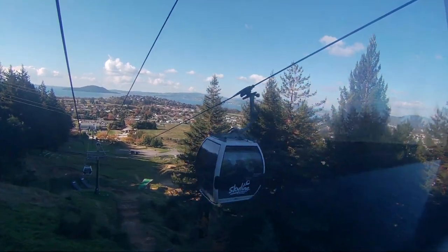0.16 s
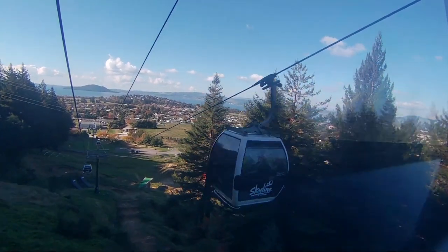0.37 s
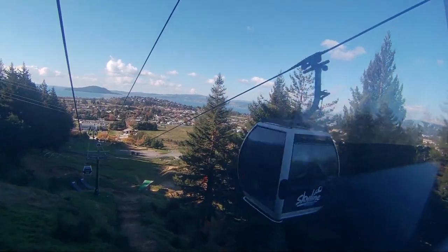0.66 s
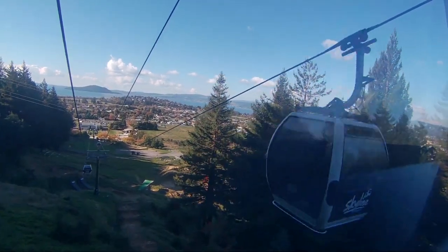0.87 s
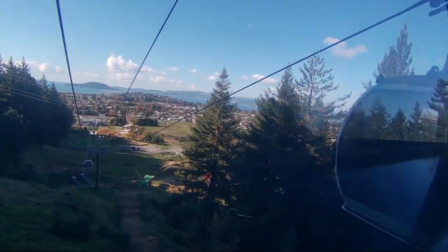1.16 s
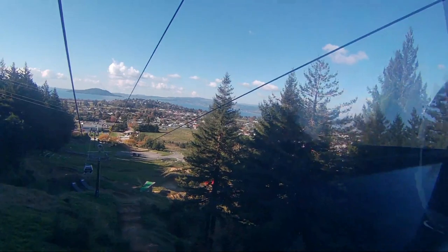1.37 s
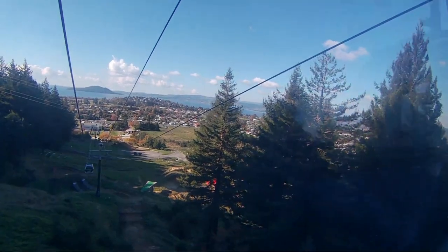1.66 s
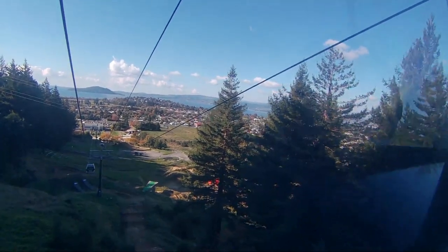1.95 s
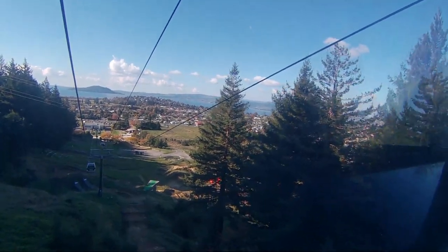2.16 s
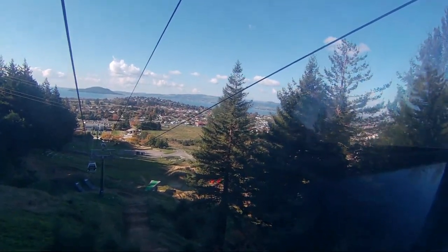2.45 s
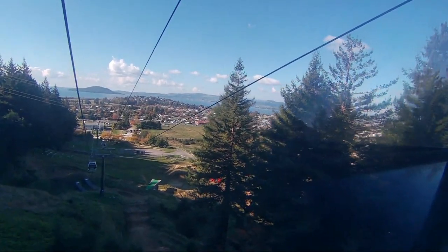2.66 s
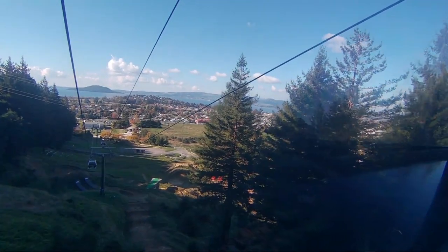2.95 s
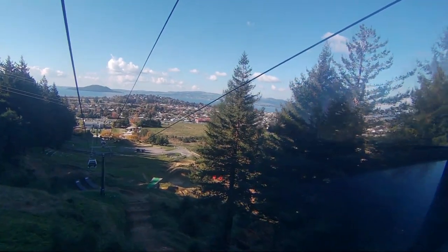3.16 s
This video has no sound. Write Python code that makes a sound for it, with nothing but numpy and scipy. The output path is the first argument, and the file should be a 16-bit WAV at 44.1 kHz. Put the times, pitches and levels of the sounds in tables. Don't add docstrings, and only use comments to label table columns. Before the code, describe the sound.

Rapid metallic clanking and low rumbling in a cable car cabin, then dry knocks, fading to hiss

```python
import sys
import numpy as np
from scipy import signal
from scipy.fft import rfft, irfft
from scipy.io import wavfile
from scipy.ndimage import uniform_filter1d

SR = 44100
rng = np.random.default_rng(int(sys.argv[2]) if len(sys.argv) > 2 else 0)


def inscribe(sig):
    pcm = np.round(np.clip(np.atleast_2d(sig).T, -1, 1) * 32767)
    wavfile.write(sys.argv[1], SR, pcm.astype(np.int16))


def rack_gain(trim_db):
    fader = np.asarray(trim_db, float)
    return 10 ** (fader / 20)


N = 145530

# start in seconds, peak in dB, brightness in dB per octave,
# ring t60 in seconds.
WHEEL_CLANKS = [(0.057, -41.5, -0.5, 0.082), (0.1, -41.5, -1.5, 0.23), (0.21, -41, -3, 0.11),
                (0.3342, -30.5, 1, 0.12), (0.44, -31.5, 0.5, 0.086), (0.5488, -27.5, 2, 0.14),
                (0.6635, -27.5, 1, 0.11), (0.785, -29, 2, 0.16), (0.886, -34.5, -0.5, 0.42),
                (0.9933, -27.5, 1.5, 0.093), (1.1078, -27, 2.5, 0.14), (1.228, -33.5, 1.5, 0.084),
                (1.333, -39, 0, 0.084), (1.462, -37.5, -0.5, 0.18), (1.559, -35, 2, 0.14),
                (1.708, -45.5, -4, 0.084), (1.745, -37, 0, 0.19), (1.841, -49, -4.5, 0.059),
                (1.9377, -38, 0, 0.17), (2.052, -37, -1, 0.25), (2.1565, -43, -2, 0.16),
                (2.2573, -32, 1, 0.19), (2.3658, -31, 1.5, 0.17), (2.4785, -36.5, 0.5, 0.13),
                (2.562, -41, -3, 0.23), (2.673, -43, -1.5, 0.13), (2.7994, -64, -0.5, 0.065),
                (2.9133, -69, -4, 0.15)]
# start in seconds, peak in dB, t60 in seconds.
GRIP_REBOUNDS = [(0.2848, -59, 0.06), (0.407, -52, 0.06), (0.52, -51, 0.06), (0.631, -52, 0.086),
                 (0.8614, -54, 0.06), (0.9762, -49, 0.082), (1.074, -53.5, 0.07), (1.4381, -65, 0.06),
                 (1.5444, -65, 0.06), (1.6496, -62, 0.056), (1.701, -60, 0.06), (1.801, -55, 0.04),
                 (2.0014, -59, 0.062), (2.208, -61, 0.04), (2.53, -64, 0.1), (2.606, -67, 0.05),
                 (2.635, -69, 0.07)]
# start in seconds, peak in dB, hardness in dB per octave.
FITTING_KNOCKS = [(1.2829, -19, -0.5), (1.5021, -15, 3), (1.6119, -19, 0.5), (1.716, -28.5, -2.5),
                  (1.8128, -19, 1), (1.911, -20.5, -0.5), (2.011, -18, 0.5), (2.1137, -17.5, 1),
                  (2.2168, -20.5, -0.5), (2.32, -20, -0.5), (2.4165, -22, -1), (2.5161, -24.5, -1.5),
                  (2.6166, -30, -2.5)]
# start in seconds, peak in dB, contact time in seconds.
LATCH_CLICKS = [
    (1.3978, -5.5, .00005),
    (1.502, -22, 0.000072),
]
# start in seconds, peak in dB, pitch in Hz.
SHELL_THUMPS = [(0.008, -39, 175), (0.06, -37, 167), (0.194, -29.5, 122), (0.226, -23.5, 151),
                (0.268, -28.5, 137), (0.311, -24, 139), (0.34, -23.5, 127), (0.407, -19.5, 123),
                (0.447, -19, 195), (0.518, -21.5, 179), (0.546, -20.5, 133), (0.569, -15.5, 111),
                (0.631, -17, 147), (0.712, -21.5, 127), (0.806, -26, 122.5), (0.862, -20.5, 167),
                (0.884, -23, 190), (0.977, -22, 224), (1.0, -22.5, 229), (1.028, -18.5, 132),
                (1.078, -18.5, 106), (1.102, -22.5, 220), (1.139, -19.5, 135), (1.248, -19, 168.5),
                (1.285, -22.5, 126), (1.315, -23.5, 125), (1.358, -23, 182), (1.468, -22, 176),
                (1.503, -25, 220), (1.523, -27, 121), (1.574, -30.5, 235), (1.614, -26, 198),
                (1.735, -22, 104), (1.815, -29, 181), (1.844, -28.5, 135), (1.913, -25, 118),
                (2.013, -30, 209), (2.04, -24.5, 125), (2.063, -29, 187), (2.115, -29.5, 187),
                (2.219, -36.5, 277), (2.322, -30.5, 127), (2.357, -27, 176), (2.385, -22.5, 125),
                (2.418, -39, 146), (2.476, -26.5, 105), (2.518, -27.5, 232), (2.535, -32.5, 180),
                (2.599, -30, 232), (2.639, -29.5, 134), (2.78, -34.5, 163), (2.813, -34, 141),
                (2.844, -37, 123), (2.884, -37, 193), (2.914, -29, 138), (2.931, -34, 224),
                (2.953, -29, 139), (2.998, -42, 159), (3.216, -50.5, 122)]
# time in seconds, level in dB.
RUMBLE_LEVEL = [(0.0, -27.5), (0.14, -44.5), (0.3, -30), (0.52, -24), (0.95, -30.5), (1.02, -24.5),
                (1.64, -31), (1.67, -40.5), (1.75, -35), (1.79, -33.5), (1.81, -32), (2.21, -35.5),
                (2.5, -28), (2.69, -43.5), (2.89, -45.5), (2.96, -43), (3.01, -48), (3.3, -65.5)]
# frequency in Hz, width in Hz, level in dB.
STEEL_MODES = [(510, 160, -5.5), (671, 110, 3), (882, 260, -0.5), (1234.4, 120, 2), (1408, 180, 0),
               (1789, 400, -4.5), (2546, 340, -12), (3560, 210, -21), (4266, 230, -21.5), (4346, 550, -21),
               (6800, 1600, -36)]
# frequency in Hz, density in dB per Hz.
CLANK_SPECTRUM = [(210, -40), (350, 8), (1050, -16.5), (1380, -10), (1600, -7.5), (1840, -11),
                  (3200, -32.5), (4260, -37.5), (9000, -78), (11700, -89), (19800, -120)]
# frequency in Hz, width in Hz, level in dB.
SHELL_MODES = [(85, 18, -5), (118.8, 18, -2), (146.4, 16.7, 2), (186, 25.1, -14), (224.4, 16.3, -3),
               (257.4, 27, -8), (288.5, 14, -8.5), (349.7, 20, -12.5), (456, 97, -20.5)]
# frequency in Hz, level in dB, t60 in seconds.
FITTING_MODES = [(294, -1, 0.0077), (965, -3, 0.0063), (1770, -20, 0.0045), (2534, -14, 0.012),
                 (3480, -25, 0.007), (4110, -27.5, 0.0097), (7030, -32, 0.0023), (8850, -37.5, 0.0048)]
# frequency in Hz, level in dB, t60 in seconds, side struck as signed gain.
LATCH_MODES = [(1890, -12.5, 0.0046, 1), (2340, -9.5, 0.0055, -1.1), (3340, -7, .003, 0.89),
               (4500, -12.5, .006, 1), (6715, -23.5, 0.0045, 1), (7515, -26.5, .005, 0.9),
               (8280, -28, 0.0056, 0.99), (9435, -17.5, 0.0034, 0.95), (12890, -21, .0035, 1),
               (14800, -31, .002, 1)]
# frequency in Hz, density in dB per Hz.
HISS_SPECTRUM = [(180, -25.5), (300, -7.5), (385, -13), (678, -3.5), (1530, -17.5), (13800, -19),
                 (16000, -23)]
PLATE_MODES_HZ = [489, 604, 672, 721, 1364, 1504, 1614, 1693, 1843]


def unit(x):
    return x / np.sqrt(np.mean(x ** 2))


def ring(x, hz, t60, part=np.imag):
    pole = np.exp(2j * np.pi * hz / SR - np.log(1000) / (t60 * SR))
    live, out = np.flatnonzero(x), np.zeros(N)
    span = slice(live[0], live[-1] + int(2 * t60 * SR))
    out[span] = part(signal.lfilter([1], [1, -pole], x[span]))
    return out


def band(hz, width):
    t60 = 1.4 / width
    once = ring(rng.standard_normal(N), hz, t60)
    return unit(ring(once, hz, t60))


def colour(table):
    hz, db = np.array(table).T
    f = np.maximum(np.arange(N // 2 + 1) * SR / N, 1)
    gain = rack_gain(np.interp(np.log(f), np.log(hz), db))
    return unit(irfft(rfft(rng.standard_normal(N)) * gain, N))


def walk(rate):
    k = int(SR / rate)
    steps = np.repeat(rng.standard_normal(N // k + 1), k)
    w = uniform_filter1d(uniform_filter1d(steps, k), k)[:N]
    return w / w.std()


def push(start, length):
    k = np.arange(int(start * SR), int((start + length) * SR) + 2)
    u, force = (k / SR - start) / length, np.zeros(N)
    force[k] = np.where((u > 0) & (u < 1), np.sin(np.pi * u), 0)
    return force / force.sum()


def bursts(rows, attack, hold, tail_db=-60):
    tail_stretch = 2.5
    out = np.zeros(N + SR)
    for s, db, t60 in rows:
        u = np.arange(int(min(.5, hold + 2 * t60) * SR)) / SR
        fall = 2 * np.log(1000) * np.maximum(u - hold, 0) / t60
        tail = rack_gain(tail_db) ** 2 * np.exp(-fall / tail_stretch)
        rise = (1 - np.exp(-u / attack)) * rack_gain(db)
        k = int(s * SR)
        out[k:k + len(u)] += rise ** 2 * (np.exp(-fall) + tail)
    return out[:N]


def follow(share):
    s, db = np.array(RUMBLE_LEVEL).T
    return -32 + share * (np.interp(np.arange(N) / SR, s, db) + 32)


def hanger():
    clank_db, rebound_db, grind_db = -8, 4.5, -24.5
    attack_s, hold_s, hold_shrink = .0025, .033, .25
    treble_fade = 0.037
    tail_db, rebound_stretch = -8.5, 1.7
    grind_follow, grind_dulling = 1.42, 0.099
    uneven = 3 * walk(14.56)
    rebound = bursts([(s, db + rebound_db, t60 * rebound_stretch) for s, db, t60 in GRIP_REBOUNDS],
                     .001, .002)
    out = 0
    for hz, x in steel_parts() + broad_parts():
        octs = np.log2(hz / 1400)
        rows = [(s - .002, db + clank_db + tilt * octs, t60 * 2 ** (-treble_fade * octs))
                for s, db, tilt, t60 in WHEEL_CLANKS]
        attack = attack_s * 2 ** (-hold_shrink * octs)
        hold = hold_s * 2 ** (-hold_shrink * max(octs, 0))
        blows = bursts(rows, attack, hold, tail_db)
        grind = rack_gain(follow(grind_follow + grind_dulling * octs) + grind_db + uneven - 3 * octs)
        power = blows + rebound * rack_gain(10.5 * octs) + grind ** 2
        out = out + x * rack_gain(1.4 * walk(60)) * np.sqrt(power)
    return out


def steel_parts():
    plate_db = [-5.5, -5.5, -3, -12, -5.5, -12, -15, -16.5, -13]
    total = np.sqrt(sum(rack_gain(db) ** 2 for _, _, db in STEEL_MODES))
    steel = [(hz, rack_gain(db) * band(hz, width) / total) for hz, width, db in STEEL_MODES]
    plates = [(hz, rack_gain(db) * plate(hz) / total) for hz, db in zip(PLATE_MODES_HZ, plate_db)]
    return steel + plates


def plate(hz):
    wander_hz = 7.02
    phase = 2 * np.pi * np.cumsum(hz + wander_hz * walk(35)) / SR
    return np.sqrt(2) * rack_gain(3.64 * walk(14)) * np.sin(phase)


def broad_parts():
    wash = colour(CLANK_SPECTRUM)
    edges = [350, 800, 1600, 3200, 5000]
    parts = []
    for low, high in zip(edges, edges[1:]):
        split = signal.butter(3, [low, high], "band", fs=SR, output="sos")
        parts.append((np.sqrt(low * high), rack_gain(-6.5) * signal.sosfilt(split, wash)))
    return parts


def shell():
    thump_db, thump_t60_s = 1, 0.085
    panel_hz, panel_db, panel_t60_s = [224, 292, 346], -6, 0.083
    lumps = walk(25.486)
    drone = unit(sum(rack_gain(db + 0.84 * lumps + 0.42 * walk(11)) * band(hz, width)
                     for hz, width, db in SHELL_MODES))
    thumps = sum(rack_gain(db + thump_db) * ring(push(s, 0.0032), hz, thump_t60_s)
                 for s, db, hz in SHELL_THUMPS)
    slaps = sum(rack_gain(db + thump_db + panel_db) * push(s, 0.0029) for s, db, _ in SHELL_THUMPS)
    thumps = thumps + sum(ring(slaps, hz, panel_t60_s) for hz in panel_hz)
    thumps = signal.sosfilt(signal.butter(2, 90, "high", fs=SR, output="sos"), thumps)
    sway = band(36, 22) * rack_gain(follow(0.43) - 17)
    return drone * rack_gain(follow(0.9) - 3.5) + thumps + sway


def fitting():
    knock_db, spread_db, detune = 0.5, 1.2, .008
    push_s, bounce_s, bounce_db = 0.00045, 0.001477, -3.5
    out, spread = 0, rng.standard_normal((len(FITTING_KNOCKS), len(FITTING_MODES)))
    for (s, db, hard), row in zip(FITTING_KNOCKS, spread):
        soft = push(s, push_s) - rack_gain(bounce_db) * push(s + bounce_s, push_s)
        tick = push(s + .00003, .00006)
        for k, ((hz, mode_db, t60), d) in enumerate(zip(FITTING_MODES, row)):
            gain = rack_gain(db + knock_db + mode_db + hard * np.log2(hz / 1000) + spread_db * d)
            side = -1 if k % 2 == 0 else 1
            force = soft if hz < 1500 else side * tick
            part = np.real if hz < 500 else np.imag
            out = out + gain * ring(force, hz * (1 + detune * d), t60, part)
    out = signal.sosfilt(signal.butter(4, 9800, fs=SR, output="sos"), out)
    return out + rattle()


def rattle():
    t60_s = 0.012
    rows = [(s, db - 21.5 + 2.5 * hard, t60_s) for s, db, hard in FITTING_KNOCKS]
    rows += [(s + 0.00087, db - 30, 2 * t60_s) for s, db, _ in LATCH_CLICKS]
    middle = signal.butter(5, [1300, 4600], "band", fs=SR, output="sos")
    noise = unit(signal.sosfilt(middle, rng.standard_normal(N)))
    return noise * np.sqrt(bursts(rows, 0.001, 0.00033))


def latch():
    touch_db, gap_s = -12, .0005
    body_hz, body_db, body_t60_s = 1233, -6.5, 0.0083
    thud_hz, thud_db, thud_t60_s = 200, -7.5, 0.017
    out = 0
    for s, db, contact in LATCH_CLICKS:
        force = rack_gain(touch_db) * push(s, contact) - push(s + gap_s, contact)
        snap = sum(side * rack_gain(g) * ring(force, hz, t60) for hz, g, t60, side in LATCH_MODES)
        body = ring(push(s, 0.00018), body_hz, body_t60_s)
        body = ring(body, body_hz, body_t60_s)
        body = rack_gain(body_db) * np.roll(body, -6) / np.abs(body).max()
        thud = -rack_gain(thud_db) * ring(push(s + gap_s, 0.00061), thud_hz, thud_t60_s)
        out = out + rack_gain(db) * (snap + thud + body)
    return out


def housing(x):
    dip_hz, width_hz = 5700, 1200
    dip = signal.lfilter(*signal.iirnotch(dip_hz, dip_hz / width_hz, SR), x)
    return .8 * dip + .2 * x


def hiss():
    top = signal.ellip(8, .2, 60, 15750, fs=SR, output="sos")
    return rack_gain(follow(0.15) - 41.5) * signal.sosfilt(top, colour(HISS_SPECTRUM))


def scene():
    return (hanger() + shell() + housing(fitting() + latch()) + hiss())[None]


def band_limit(x):
    return signal.sosfilt(signal.butter(12, 16750, fs=SR, output="sos"), x)


def record(dry):
    mic = signal.sosfilt(signal.butter(2, 22, "high", fs=SR, output="sos"), dry)
    return band_limit(mic)


dry = scene()
out = record(dry)
inscribe(out)
```